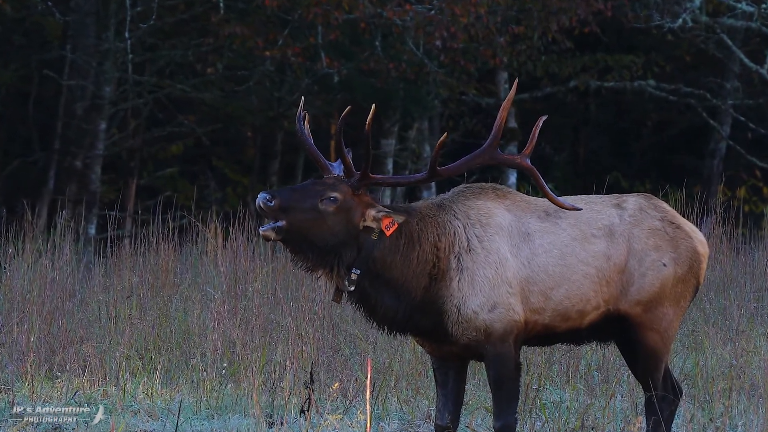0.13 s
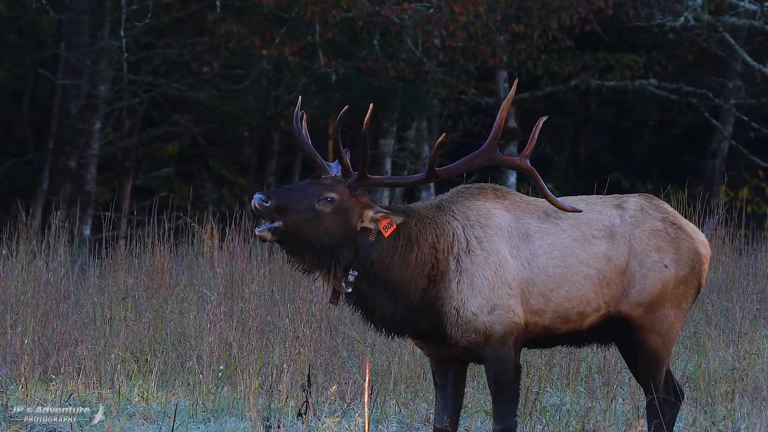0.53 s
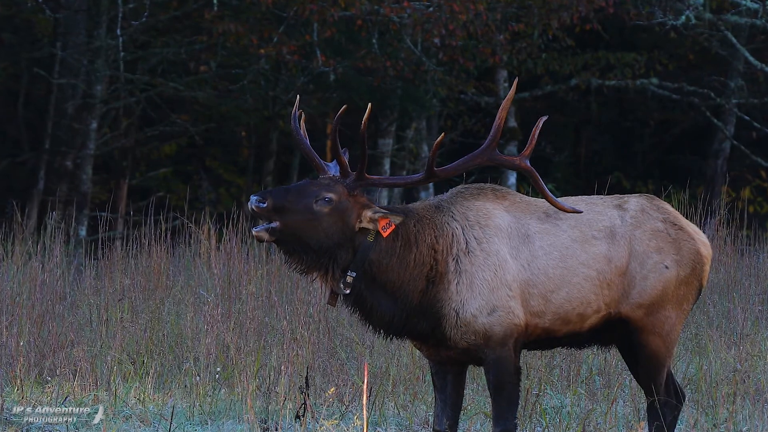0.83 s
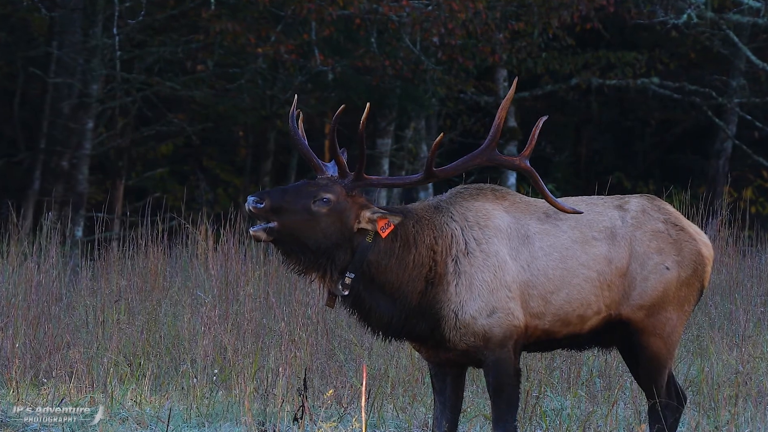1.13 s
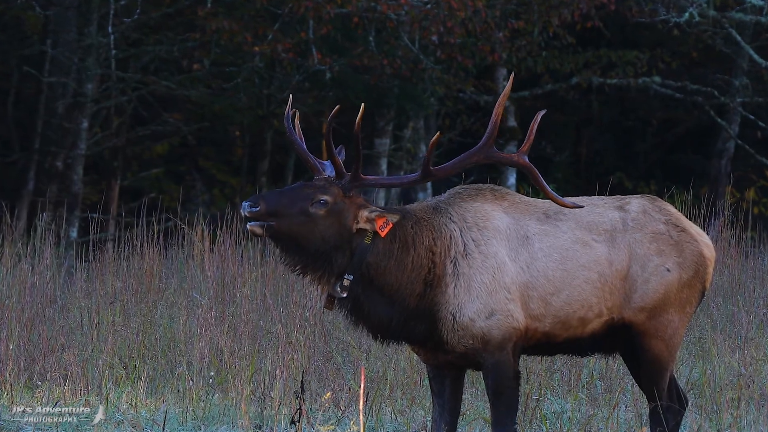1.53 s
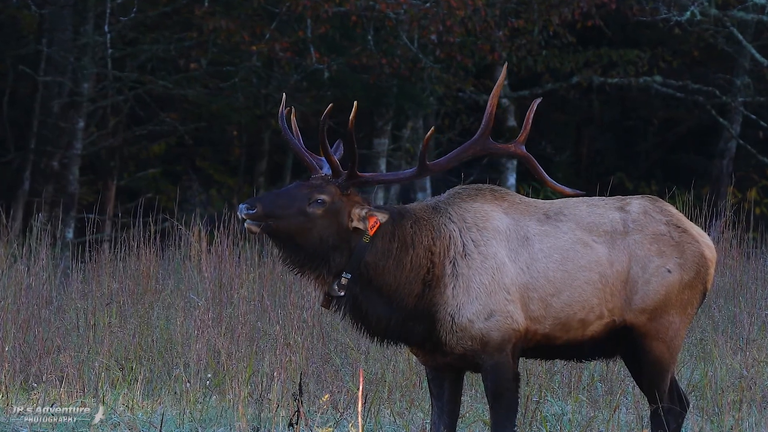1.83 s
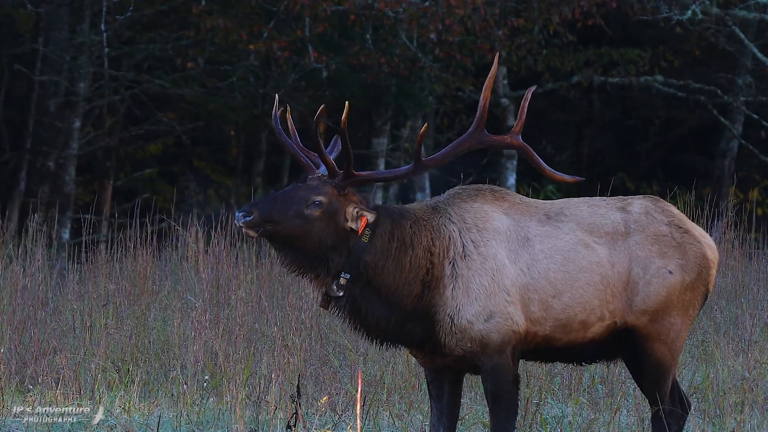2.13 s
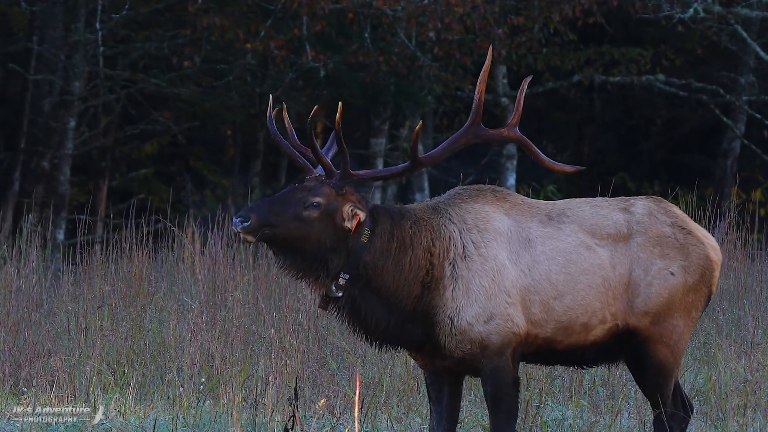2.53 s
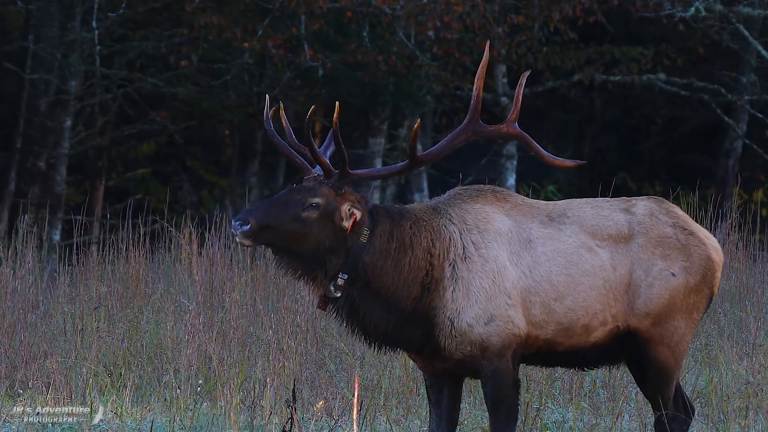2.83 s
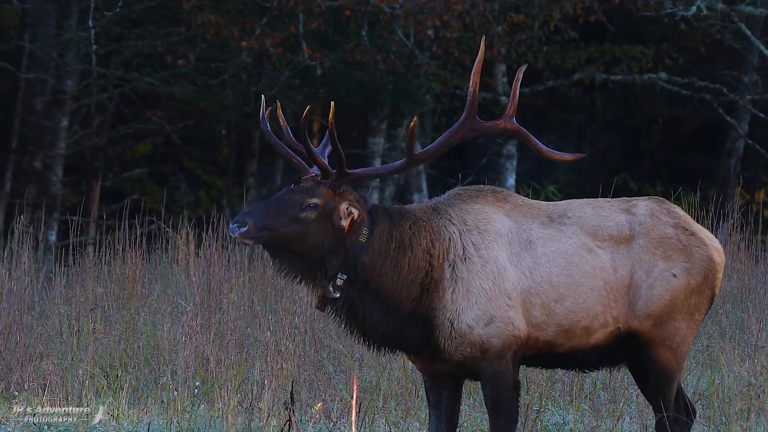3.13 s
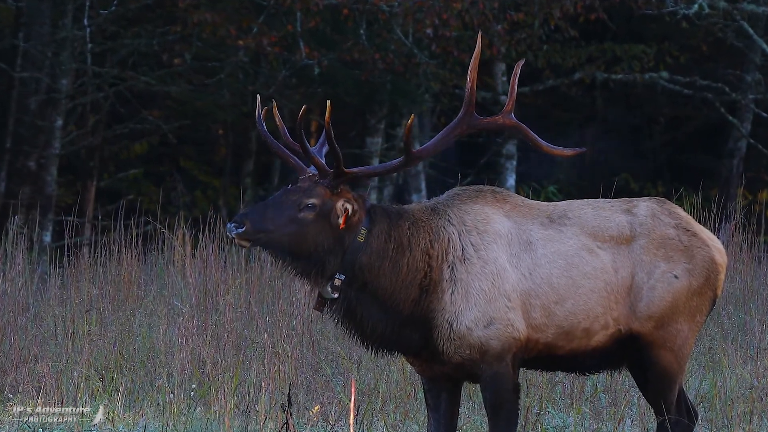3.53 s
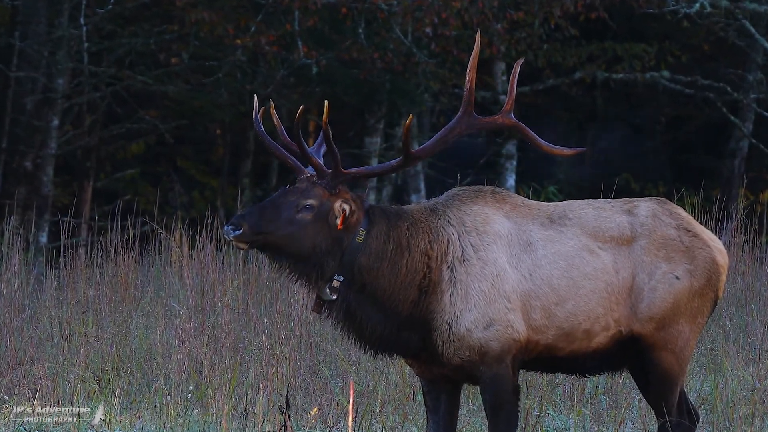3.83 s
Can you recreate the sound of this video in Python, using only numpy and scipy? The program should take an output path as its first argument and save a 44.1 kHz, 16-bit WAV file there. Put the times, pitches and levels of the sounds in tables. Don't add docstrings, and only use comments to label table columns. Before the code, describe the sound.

A bull elk's bugle, already sounding, holds a piercing, slightly raspy whistle, drops in steps and stops; its echo fades off the trees over a faint distant murmur, in one open outdoor microphone.

```python
import sys
import numpy as np
from scipy import signal
from scipy.fft import rfft, irfft, next_fast_len
from scipy.io import wavfile
from scipy.ndimage import uniform_filter1d, map_coordinates

SR = 44100
rng = np.random.default_rng(int(sys.argv[2]) if len(sys.argv) > 2 else 0)


def volts(x):
    e = np.asarray(x, float) / 20
    return 10 ** e


def pcm_store(signal):
    levels = np.round(np.clip(np.atleast_2d(signal), -1, 1) * 32767)
    wavfile.write(sys.argv[1], SR, levels.astype(np.int16).T)


N = 176400
LEAD_S = 2
M = N + LEAD_S * SR
T = np.arange(M) / SR - LEAD_S


def unit(x):
    return x / np.sqrt(np.mean(x ** 2) + 1e-20)


def along(points, hz):
    f, v = np.transpose(points)
    return np.interp(np.log(hz + 1), np.log(f + 1), v)


def curves(rows):
    s, *cols = np.transpose(rows)
    return [uniform_filter1d(np.interp(T, s, c), size=881) for c in cols]


def wobble(rate):
    knots = rng.standard_normal(int(M * rate / SR) + 4)
    return map_coordinates(knots, [np.arange(M) * rate / SR])


def filtered(x, response):
    m = next_fast_len(len(x) + SR // 2)
    return irfft(rfft(x, m) * response(np.fft.rfftfreq(m, 1 / SR)), m)[:len(x)]


def turns(hz):
    return 2 * np.pi * np.cumsum(hz) / SR


# time in seconds, whistle, octave and rasp levels in dB.
CALL_LEVELS = [(0, -26, -48.5, -47.5), (.24, -28, -53, -46), (.37, -26.5, -46.5, -48),
               (.42, -24.5, -47, -60.5), (.47, -26.5, -45, -58), (.52, -24.5, -45.5, -46),
               (.6, -27.5, -48.5, -49), (.68, -25.5, -47, -48), (.775, -25.5, -49, -49.5),
               (.81, -36.5, -35, -43), (.87, -44.5, -42.5, -47), (1.12, -44, -51.5, -49),
               (1.17, -42, -42.5, -51.5), (1.215, -35.5, -71, -57.5), (1.275, -43.5, -73.5, -50.5),
               (1.31, -33.5, -67, -58), (1.375, -47, -61.5, -55.5), (1.43, -41, -78, -52)]
# time in seconds, pitch in Hz.
WHISTLE_PITCH = [(0, 1038), (.25, 1036), (.42, 1051), (.52, 1043), (.68, 1037), (.745, 1025), (.775, 990),
                 (.8, 920), (.835, 865), (.915, 806), (.95, 818), (1.04, 796), (1.12, 789), (1.165, 757),
                 (1.215, 690), (1.27, 712), (1.37, 652), (1.46, 530)]
# time in seconds, flap rate in Hz, jitter as a share of the rate,
# breath share 0-1, depth of the swing on every second flap.
FOLD_MOTION = [
    (0, 98, .2, .7, .1),
    (.35, 98, .15, .65, .1),
    (.5, 101, .015, .35, .45),
    (.74, 101, .015, .4, .45),
    (.8, 102, .025, .8, .2),
    (1.15, 103, .025, .75, .1),
    (1.25, 105, .08, .8, .05),
]
HELD_HZ = 1042


def bugle():
    whistle_db, octave_db, rasp_db = curves(CALL_LEVELS)
    rate, jitter, airy, second = curves(FOLD_MOTION)
    tremble = 2.5 * wobble(60) * np.clip((T - .75) / 0.28, 0, 1)
    pitch = curves(WHISTLE_PITCH)[0] + 1.373 * wobble(24.92) + tremble
    phase = turns(pitch)
    flap = turns(rate * (1 + jitter * wobble(70)))

    clean = whistle(phase, whistle_db, octave_db) + overtones(phase, pitch, octave_db)
    clean += fold_sidebands(phase, flap, pitch, rate, octave_db, rasp_db)
    hum = volts(-76) * np.sin(turns(rate)) * np.clip((T - .73) / .04, 0, 1)
    rough = volts(rasp_db + .6 * wobble(11)) * rasp(phase, flap, airy, second)

    end_s, release_s = 1.4424, 0.014
    breath = 1 / (1 + np.exp(np.clip((T - end_s) / release_s * 2, -50, 50)))
    return breath * (np.sqrt(2) * (clean + hum) + rough)


def whistle(phase, whistle_db, octave_db):
    first = volts(whistle_db + 0.3 * wobble(20)) * np.sin(phase)
    octave = volts(octave_db + 1.3 * wobble(21.85)) * np.sin(2 * phase)
    return first + octave


# multiple of the pitch, level in dB on the held note,
# loss in dB per Hz of pitch drop, share 0-1 of the octave's swings.
OVERTONES = [(3, -61, .005, .45), (4, -80, .06, .4), (5, -80, .25, .7), (6, -71.5, .4, .7),
             (7, -93, .4, .9)]


def overtones(phase, pitch, octave_db):
    total = np.zeros(M)
    for k, db, sag_db, with_octave in OVERTONES:
        sag = np.maximum(sag_db * (pitch - HELD_HZ), -25)
        swing = with_octave * (octave_db + 47.5)
        total += volts(db + sag + swing + 0.95 * wobble(16)) * np.sin(round(k) * phase)
    return total


def fold_sidebands(phase, flap, pitch, rate, octave_db, rasp_db):
    branch_hz, branch_width_hz = 935, 85
    total = np.zeros(M)
    for side in (-1, 1):
        near = 1 / (1 + ((pitch + side * rate - branch_hz) / branch_width_hz) ** 2)
        total += near * volts(rasp_db - 3 + 2.5 * wobble(21)) * np.sin(phase + side * flap)

    slide = np.clip((HELD_HZ - pitch) / 150, .25, 1)
    octave_pair = np.sin(2 * phase + flap) + 0.5 * np.sin(2 * phase - flap)
    total += .33 * slide * volts(octave_db + 2.5 * wobble(25)) * octave_pair
    total += .6 * volts(rasp_db - 17.5 + 2.2 * wobble(26)) * np.sin(3 * phase - flap)
    return total


def rasp(phase, flap, airy, second):
    sharpness, carrier_tilt, fold_share = 6, 0.52, .35
    pulse = np.exp(sharpness * (np.cos(flap) - 1)) * (1 + second * np.cos(flap / 2))
    carrier = sum(np.cos(k * phase) / k ** carrier_tilt for k in range(1, 8))
    chopped = unit((pulse - uniform_filter1d(pulse, size=1764)) * (carrier + fold_share))
    air = unit((pulse + 0.9) * rng.standard_normal(M))
    rough = filtered(np.sqrt(1 - airy) * chopped + np.sqrt(airy) * air, throat)
    return rough / np.sqrt(uniform_filter1d(rough ** 2, size=4410) + 1e-9)


# centre in Hz, width in Hz, level in dB.
THROAT_MODES = [(305, 13, -9.5), (562, 32, 6), (702, 40, 0), (973, 41, 5), (1214, 120, -1), (1499, 15, 12),
                (1785, 73, -4), (2304, 100, -1), (3280, 83, -17)]
# centre in Hz, width in Hz, level in dB.
MOUTH_MODES = [(3800, 250, -35), (4240, 570, -28), (5570, 320, -29), (6220, 660, -28)]


def throat(f):
    def resonance(centre, width):
        return 1j * f * width / (centre * centre - f * f + 1j * f * width)

    low = sum((-1) ** k * volts(db) * resonance(c, w) for k, (c, w, db) in enumerate(THROAT_MODES))
    high = sum((-1) ** k * volts(db) * resonance(c, w) ** 2 for k, (c, w, db) in enumerate(MOUTH_MODES))
    return low / (1 + (f / 3300) ** 12) + high


# middle in seconds, frequency in Hz, level in dB, length in seconds.
CHEST_SWELLS = [
    (0.06, 160, -64, 0.063),
    (.11, 157, -63, 0.054),
    (0.258, 168, -64.5, 0.12),
    (0.319, 164, -55, 0.075),
    (0.614, 150, -76, 0.37),
    (.83, 312, -74, 0.14),
    (0.994, 312, -59.5, .14),
    (1.153, 310, -60.5, 0.067),
    (1.261, 165, -71, 0.23),
]


def chest():
    total = np.zeros(M)
    for s, hz, db, length in CHEST_SWELLS:
        swell = np.exp(-8 * ((T - s) / length) ** 2)
        total += np.sqrt(2) * volts(db) * swell * np.sin(2 * np.pi * hz * T)
    return total


# frequency in Hz, level in dB.
ECHO_COLOUR = [(200, -7), (600, -5), (800, -2.5), (1040, 1.5), (2000, -1), (4000, -11.5), (8000, -27.5)]


def woods(x):
    t = np.arange(5 * SR) / SR
    echo = np.zeros(len(t))
    for t60, db, build_s in [(.6, -19, .02), (1.6, -12, .08), (5.5, -28, .3)]:
        shape = volts(-60 * t / t60) * np.clip(t / build_s, 0, 1) ** 2
        echo += volts(db) * unit(shape * rng.standard_normal(len(t))) / np.sqrt(len(t))
    return filtered(signal.fftconvolve(x, echo)[:M], lambda hz: volts(along(ECHO_COLOUR, hz)))


def bird():
    start_s, length_s, rate_hz = 3.472, .255, 37
    u = (T - start_s) / length_s
    zigzag = signal.sawtooth(2 * np.pi * rate_hz * (T - start_s - .034), width=.35)
    swing = np.where(u < .13, 1 - u * 15, zigzag)
    pitch = 7650 - 200 * np.clip(u, 0, 1) + 240 * swing
    fade = np.clip(np.minimum(u, 1 - u) * 15, 0, 1)
    return volts(-81 + 2.5 * wobble(40)) * fade * np.sin(turns(pitch))


def rush(spectrum, patchy_db):
    z = signal.stft(rng.standard_normal(M), nperseg=512)[2]
    field = uniform_filter1d(rng.standard_normal(z.shape), size=5, axis=0)
    field = uniform_filter1d(field, size=12, axis=1)
    x = signal.istft(z * volts(patchy_db * unit(field)), nperseg=512)[1][:M]
    return unit(filtered(x, lambda hz: volts(along(spectrum, hz))))


# frequency in Hz, level in dB per Hz.
MURMUR_COLOUR = [(25, -17), (250, -5.5), (600, -1.5), (1100, -3.5), (1800, -6.5), (3000, -17.5),
                 (4500, -29), (8500, -36)]


def murmur():
    return volts(-64) * rush(MURMUR_COLOUR, patchy_db=.9)


# frequency in Hz, level in dB per Hz.
HISS_COLOUR = [(3000, -25), (7000, -8), (8800, -12.5), (10000, -3.5), (13000, -3.5), (15500, -5.5)]


def hiss():
    return volts(-82) * rush(HISS_COLOUR, patchy_db=-2.5)


def scene():
    elk = bugle() + chest()
    mix = elk + woods(elk) + bird() + murmur() + hiss()
    return mix[None, -N:]


def roll_off(x):
    return signal.sosfilt(signal.butter(12, 15750, fs=SR, output="sos"), x)


def record(dry):
    return roll_off(dry)


dry = scene()
out = record(dry)
pcm_store(out)
```